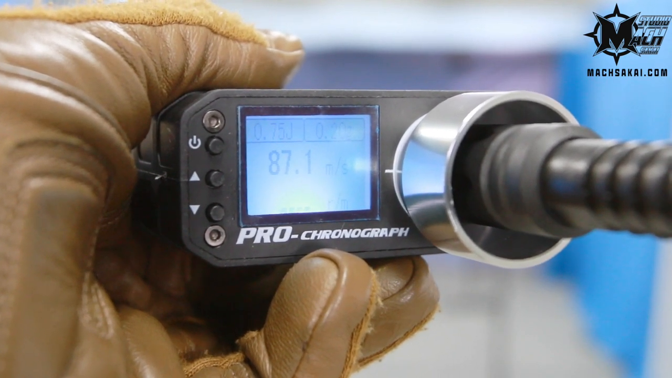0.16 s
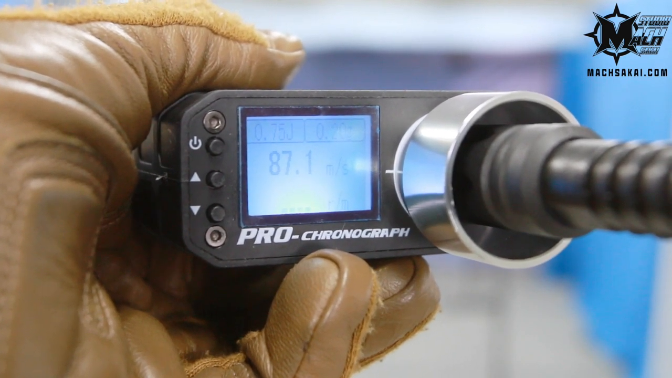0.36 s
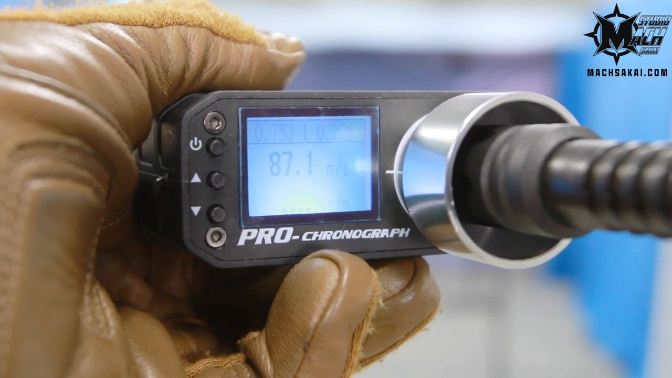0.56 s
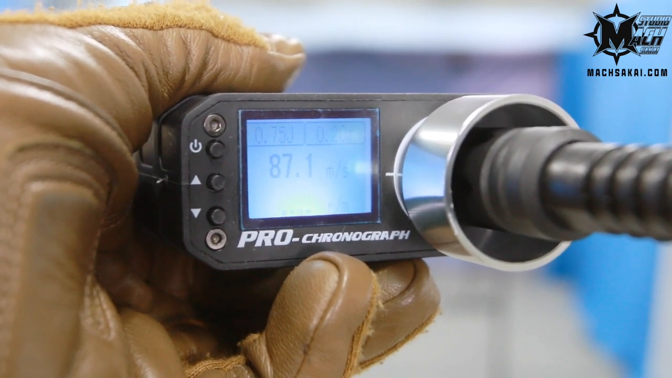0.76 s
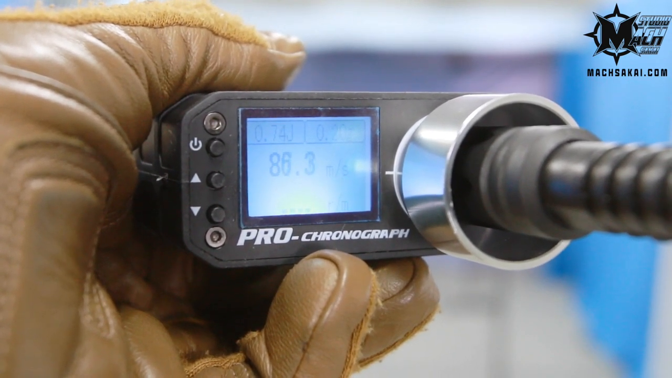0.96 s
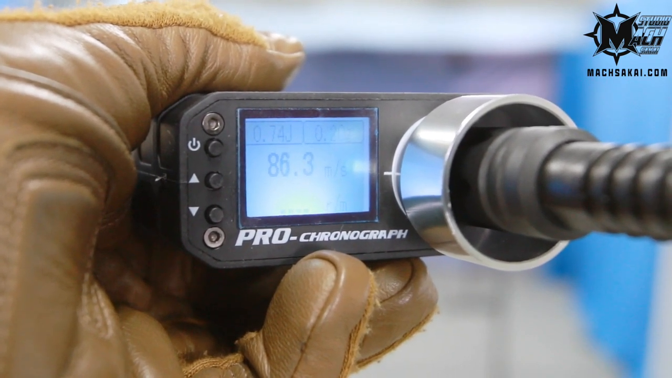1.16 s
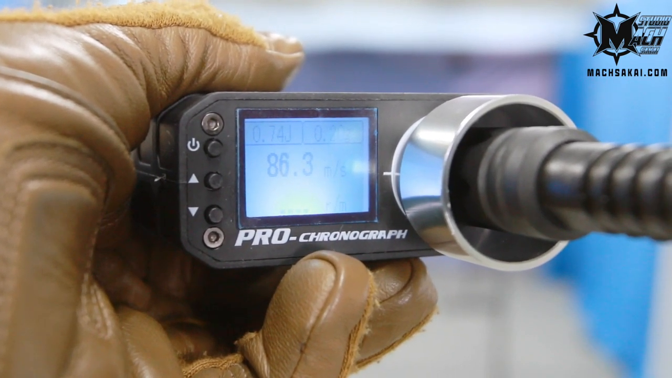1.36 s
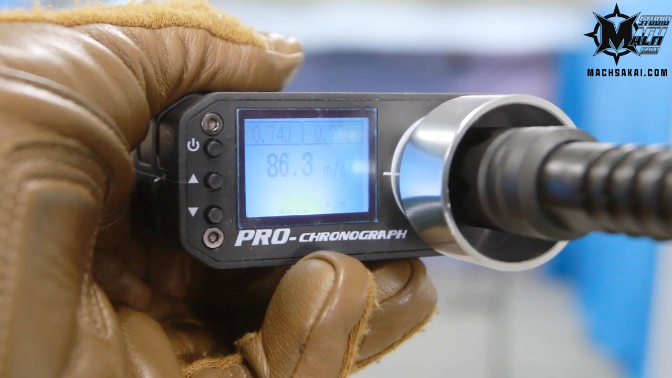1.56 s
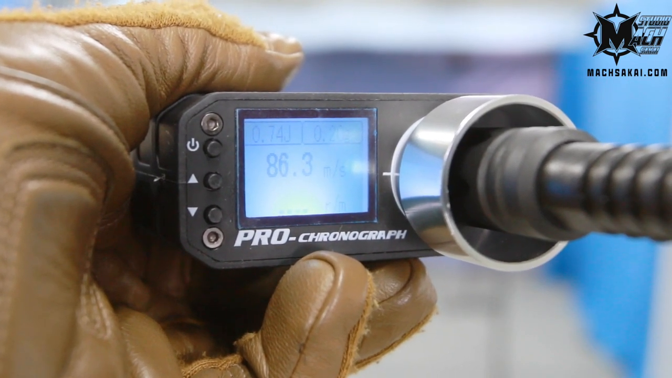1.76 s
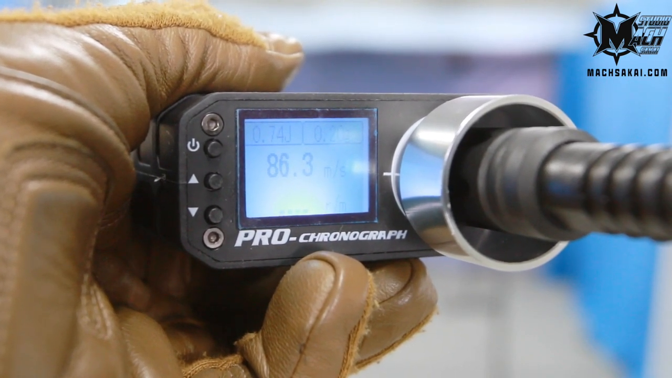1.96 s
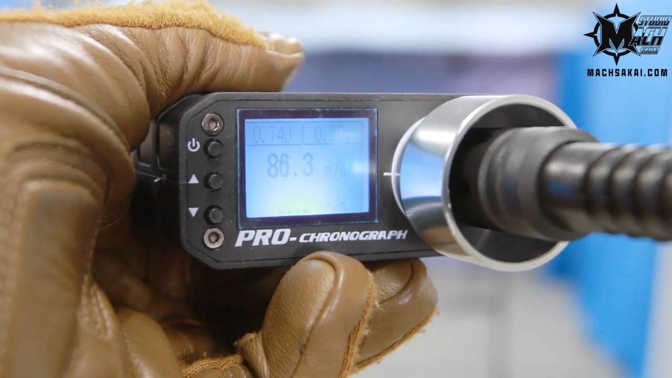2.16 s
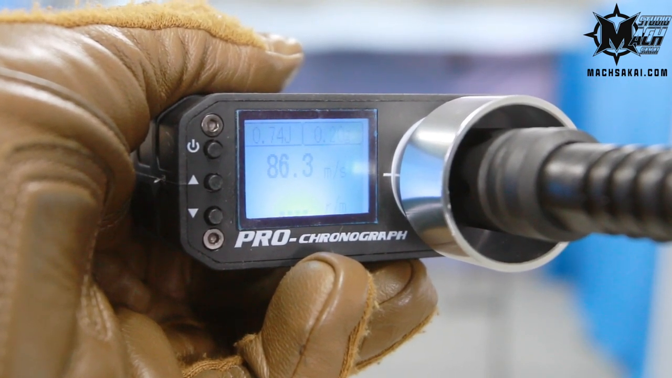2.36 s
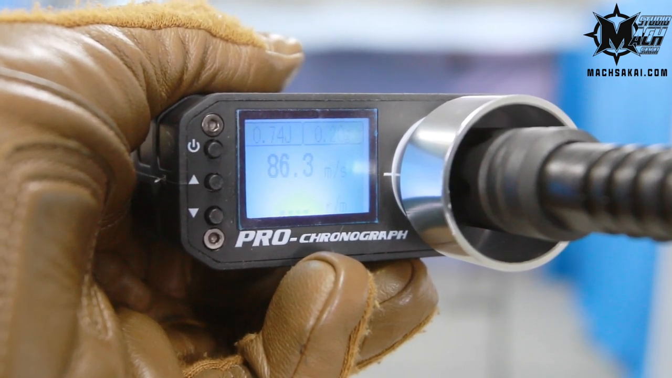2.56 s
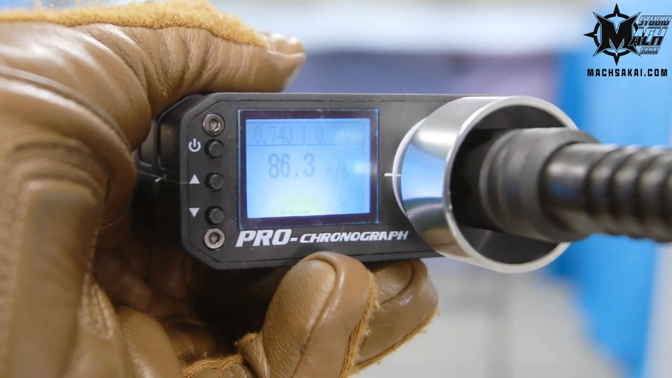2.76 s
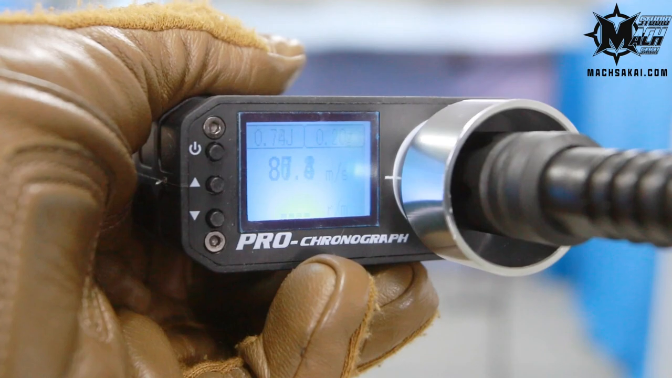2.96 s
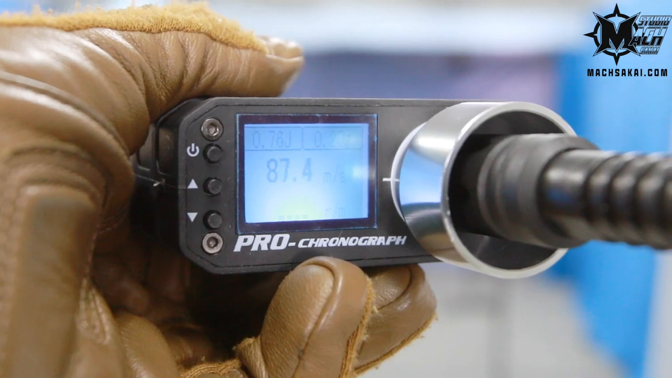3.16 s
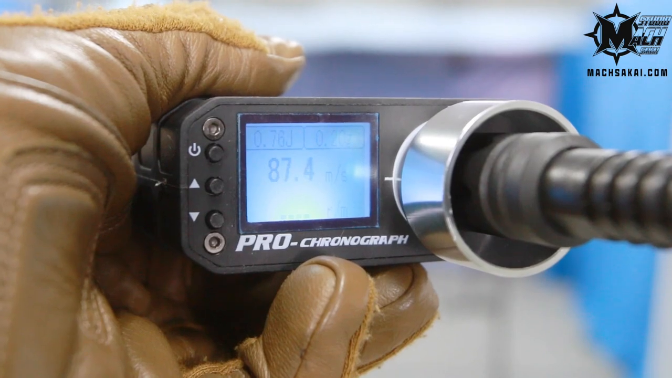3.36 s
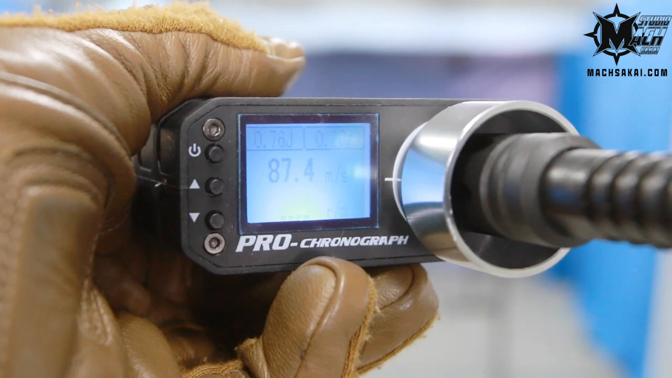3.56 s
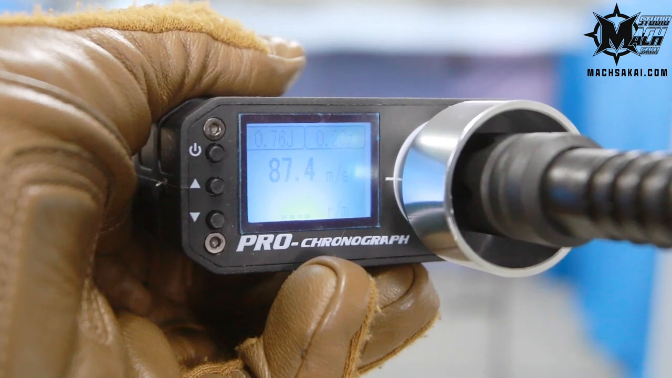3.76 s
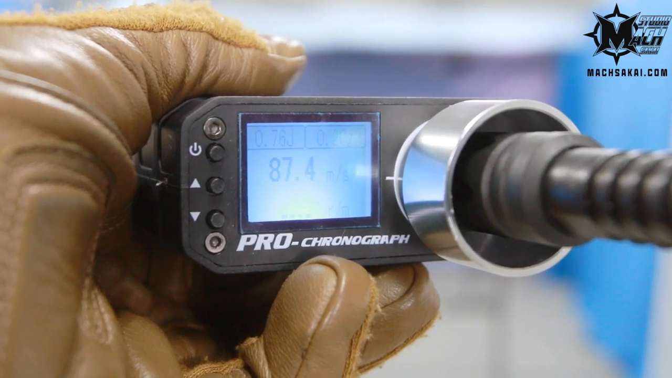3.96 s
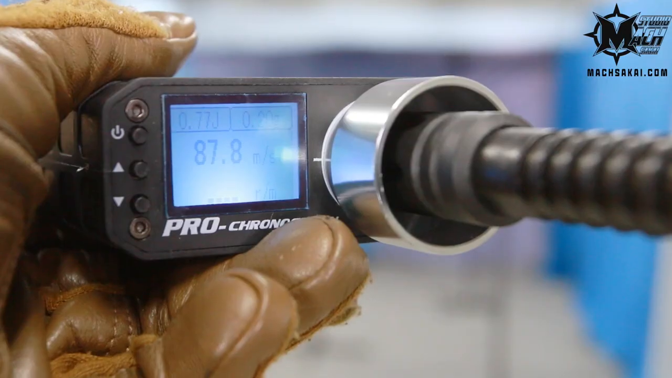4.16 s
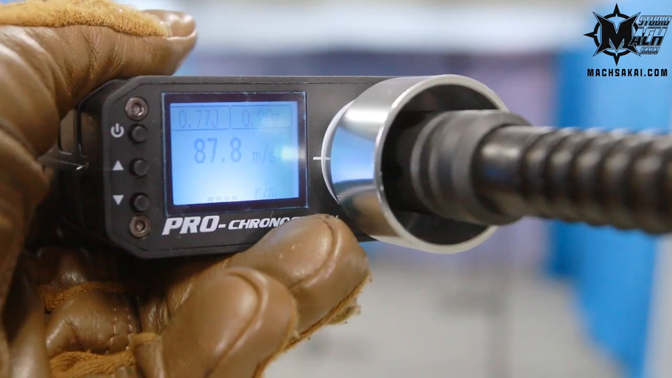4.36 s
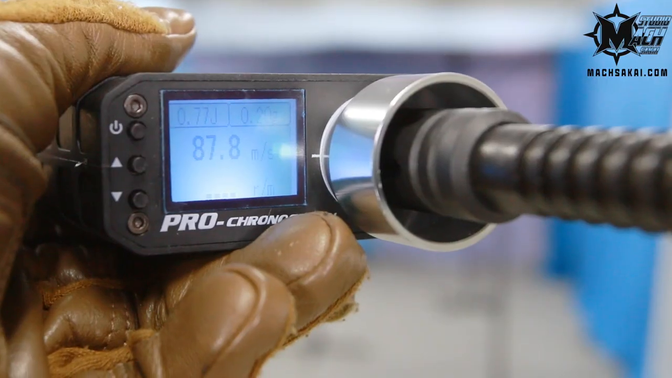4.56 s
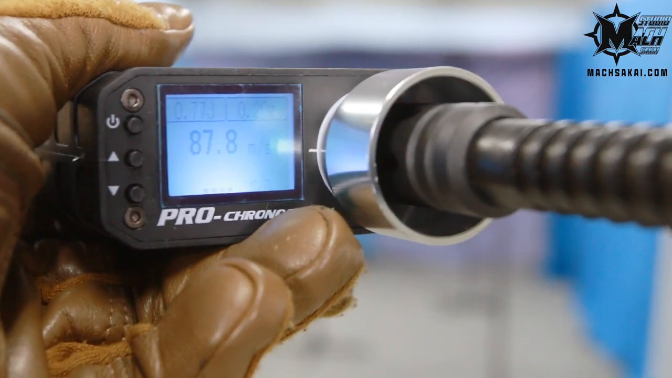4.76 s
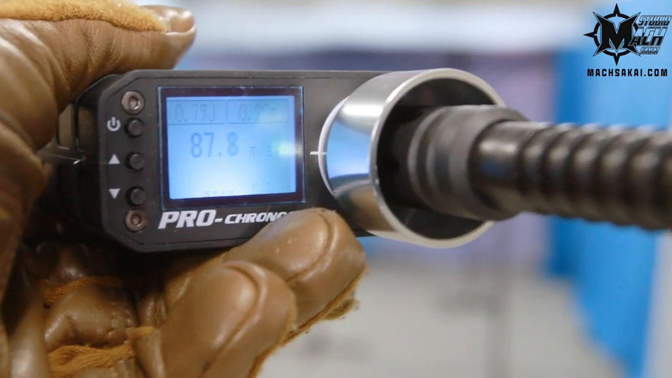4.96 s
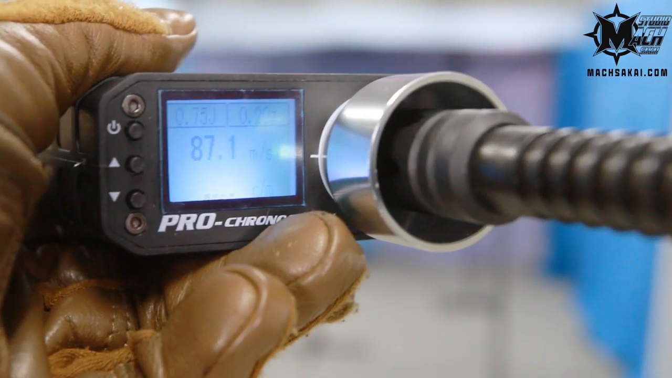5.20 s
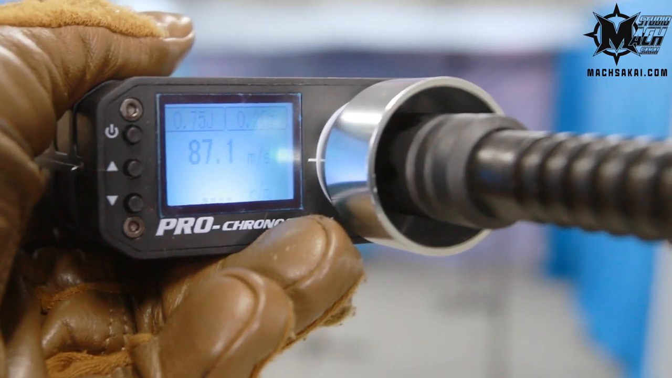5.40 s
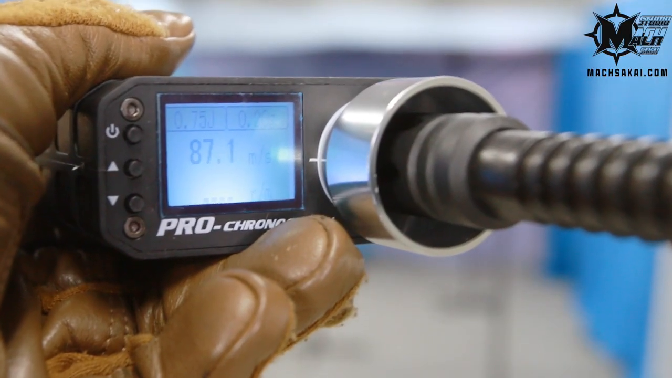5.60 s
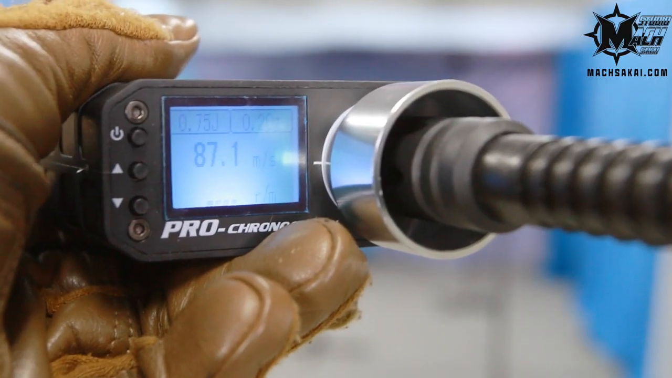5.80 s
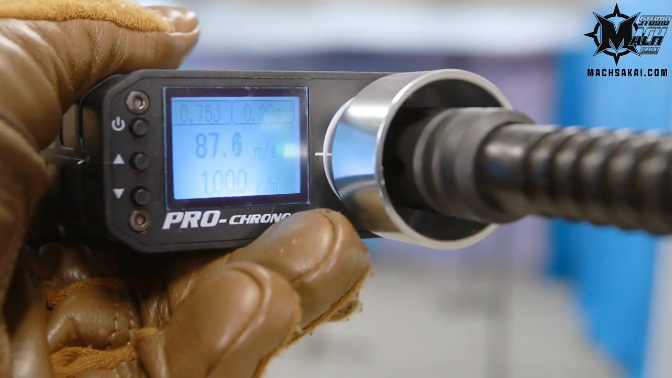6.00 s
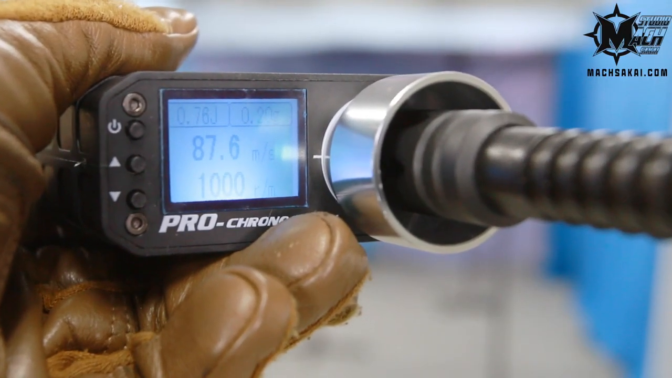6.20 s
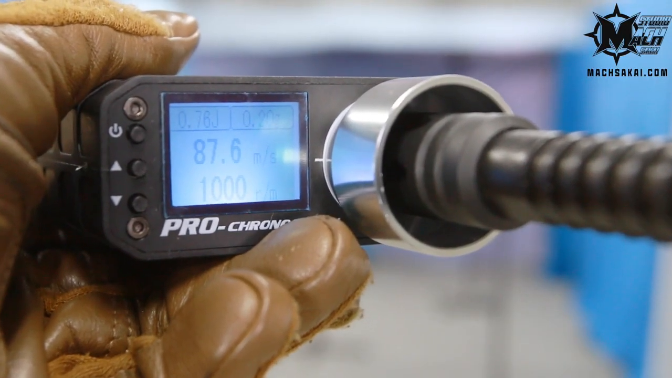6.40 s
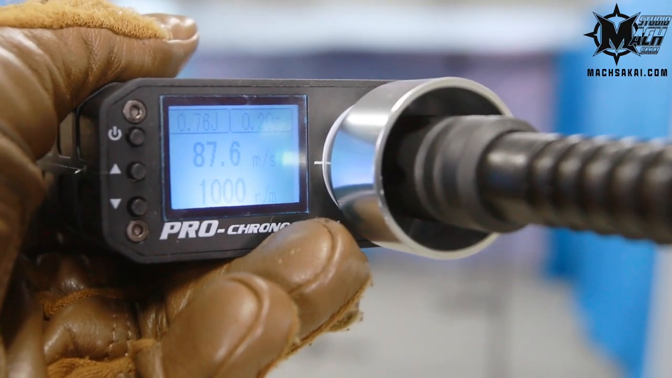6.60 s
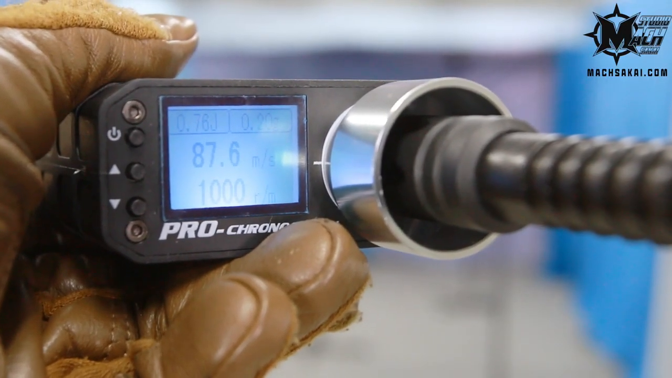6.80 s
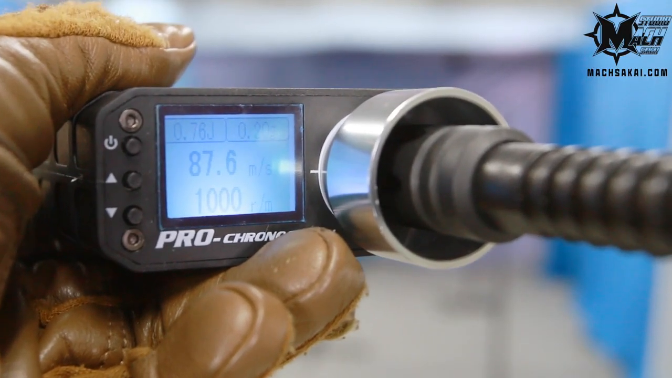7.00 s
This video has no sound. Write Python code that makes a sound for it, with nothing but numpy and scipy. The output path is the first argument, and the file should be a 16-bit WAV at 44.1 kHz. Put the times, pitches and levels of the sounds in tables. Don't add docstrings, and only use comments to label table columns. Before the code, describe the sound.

Two separate electric airsoft shots crack with brief motor whirs and ringing metal, then a one-second full-auto burst hammers before pellets skitter on the floor.

```python
import sys
import numpy as np
from scipy import signal
from scipy.fft import rfft, irfft
from scipy.io import wavfile
from scipy.ndimage import uniform_filter1d

SR = 44100
rng = np.random.default_rng(int(sys.argv[2]) if len(sys.argv) > 2 else 0)


def dump(signal):
    limited = np.clip(np.atleast_2d(signal).T, -1, 1)
    pcm = np.round(limited * 32767).astype(np.int16)
    wavfile.write(sys.argv[1], SR, pcm)


def natural_amplitude(level_db):
    exponent = np.asarray(level_db, float) / 20
    return 10 ** exponent


N = 310464

# start/s, overall gain/dB, room tone/dB
TAKES = [
    (0, -0.97, -50.5),
    (4.14, -2, -52),
    (6.404, 0.5, -50),
]
# f/Hz, level per Hz/dB
HUM_MID = [(12, -33.5), (20, -2), (87, -5), (157, -4.5), (207, -7), (266, -6.5), (478, -17), (686, -17),
           (746, -21), (834, -16), (1800, -29.5), (15500, -38.5)]
# f/Hz, level per Hz/dB
HUM_SIDE = [(12, -39.5), (20, -12), (70, -11.5), (106, 1), (133, -14), (171, -14.5), (196, -28),
            (259, -15.5), (440, -31), (614, -24.5), (1420, -37.5), (15500, -48.5)]
# t/s, level/dB
BOUNCES = [(0.0512, -42), (0.4242, -40), (0.567, -41.5), (1.3084, -32), (1.945, -34.5), (2.3147, -41.5),
           (2.5444, -43.5), (3.34, -32), (3.973, -38.5), (5.9295, -40.5), (5.9871, -35.5), (6.0639, -35),
           (6.153, -37), (6.178, -30.5), (6.2519, -35), (6.3994, -36.5), (6.4236, -34), (6.5751, -37.5),
           (6.6044, -36.5), (6.7395, -34), (6.8141, -32), (6.8903, -43), (6.9341, -33), (6.9995, -50)]
# delay/s, level/dB
FLUTTER = [(0, -2), (.0025, -2), (0.0134, -1.5), (.028, -3.5), (.033, -8.5), (.059, -13)]
# f/Hz, level/dB
BOUNCE = [(3000, -34.5), (5000, -10), (7500, -2.5), (10500, 1), (14500, -1.5), (17000, -15.5)]
# f/Hz, t60/s
ROOM = [(60, 1), (250, 0.83), (700, 0.61), (1500, 0.5), (2700, 0.61), (4000, 0.53), (9000, .38),
        (15000, 0.49)]
# t/s, level/dB, f/Hz, t60/s, side level/dB
BUMPS = [(0.683, -26, 154, 0.18, 0), (1.594, -36.5, 121.9, 0.15, -4), (2.1, -25, 146, 0.16, 0),
         (2.171, -31, 153, 0.097, 2), (2.281, -31.5, 131, 0.08, -4.5), (2.329, -38, 102, 0.08, -6),
         (3.293, -27.5, 129, 0.085, -2), (3.562, -43.5, 102, 0.08, -3.5), (3.865, -35, 160.9, 0.12, -8),
         (6.428, -38, 101.8, 0.12, -4.5), (6.991, -32.5, 132, 0.25, -1)]
# t/s, level/dB, f/Hz
CREAKS = [
    (1.723, -40.5, 1580),
    (3.716, -40, 1620),
    (4.3587, -54, 1240),
    (6.565, -47, 1900),
    (6.599, -46, 2100),
]
# trigger t/s, first slam t/s, motor off t/s, gear level/dB, slam level/dB
PULLS = [
    (0.729, .811, .85, -0.5, 2.5),
    (2.674, 2.751, 2.789, 0, 1.5),
    (4.735, 4.816, 5.76, -3.5, -1),
]
# f/Hz, level per Hz/dB
GEARS = [(90, -29.5), (150, -7), (350, -17.5), (650, -10), (1000, -9), (1500, -6.5), (2200, -9.5),
         (3300, -6.5), (5000, -11), (8500, -13), (12000, -21.5), (15500, -27), (17000, -56.5)]
# f/Hz, width/Hz, level/dB
CASE = [(644, 80, -0.5), (1306, 530, 3), (2186, 200, -9), (4470, 370, 3), (6030, 170, -4.5),
        (8580, 900, -0.5)]
# f/Hz, width/Hz, level/dB
SINGS = [(1304, 62, 1.5), (1665, 55, 0), (2394.2, 40, -2)]
# f/Hz, level/dB, t60/s
BODY = [(239, -7.5, .06), (332, -8, 0.054), (434, -6, 0.049), (717.3, -3, .04), (880, -5, .03),
        (1020, -6, 0.01), (1184, 0.5, 0.026), (1394, 2.5, .035), (1680, -7.5, 0.01), (2100, -2, 0.039),
        (2520, -1, 0.019), (2600, -3, 0.029), (2916, -3.5, 0.029), (3730, -11, 0.045)]
# f/Hz, level/dB
CRACK = [(150, -11.5), (400, -9), (1000, 4), (2500, -6.5), (3500, -8.5), (8000, -19.5), (15000, -27)]
# f/Hz, level/dB, t60/s
THUMP = [(134.6, 0, 0.11), (186, -14.5, 0.063)]
# f/Hz, level/dB, t60/s
BOOM = [(50, -7, .2), (70, -5, 0.22), (98, -5, 0.47), (107.4, -2, 0.51)]
# f/Hz, level/dB, t60/s
RINGS = [(515, -44, 2.6), (618, -49, 2.), (702, -53, 2.6), (1550, -55, 1.3), (2640, -47, .7),
         (2790, -50, .6)]
# f/Hz, left over right/dB
LEAN = [(60, 8), (240, 2), (950, 0.5), (3770, -4.5), (9000, -4), (15000, -0.5)]
# f/Hz, level/dB
SIDEWAYS = [(100, -14.5), (300, -3.5), (1000, -9), (3000, -6), (8000, -4.5), (15000, -3.5)]
# t/s, level/dB, panel drumming/dB
SMACKS = [
    (0.9143, -12.5, -23),
    (0.9383, -20.5, -25),
    (0.9717, -20.5, -25),
    (2.8623, -10.5, -29.5),
    (2.8885, -16.5, -36.5),
    (2.9292, -20.5, -41),
    (5.8227, -12, -12.5),
    (5.8441, -19, -21),
]
# f/Hz, level/dB
SMACK = [(200, -10), (600, 0), (1500, -3), (4000, -4.5), (8000, -10.5), (15000, -26.5)]
# t/s, level/dB
SCATTER = [(5.85, -63), (6.05, -66), (6.2, -58.5), (6.33, -64), (6.41, -66), (6.45, -54.5), (6.78, -57),
           (7.04, -58.5)]
# f/Hz, level/dB
ROLL = [(800, -17.5), (2000, -6.5), (4000, -8), (7000, -7), (10500, -4.5), (15000, -2)]
# f/Hz, level/dB, t60/s
CREAK_UPPER = [(1250, -3, .01), (2300, -3, .008), (2900, -4, .01), (3600, -6, .006)]

START_HZ, LOADED_HZ, FREE_HZ, STOP_HZ = 701.5, 1691, 2366, 1199
SPIN_S, FREE_S, COAST_S, DROP_S = .052, .085, .052, 0.014
START_DB, EARLY_DB, RUN_DB, OFF_DB, STOP_DB = -28.5, -18.5, -12, -13, -33
WHINE_START_DB, WHINE_EARLY_DB, STRAIN_DB, SLACK_DB, CRUISE_DB, WHINE_STOP_DB = -36.5, -21.5, -13, -26, -24, -44
FIRST_STEP_DB = -14
BURST_SHOTS, SECOND_S, CYCLE_S, JITTER_S = 14, 4.8858, .06468, .0008
BURST_DB, GROWTH_DB, SPREAD_DB = -0.5, 1.5, 0.88
TICK_DB, FIRST_TICK_DB, TICK_SPREAD_DB = -14, -24, 1.9
PUSH_DB, FIRST_PUSH_DB, PUSH_SPREAD_DB = -27, -22, 2.5
REBOUND_S, REBOUND_DB = .035, -8.5
FEW_PER_S, MANY_PER_S, FEW_DB, MANY_DB = 200, 600, -64, -56
CUT_S, DIP_DB, DIP_S = 6.404, -24, .012


def evened(x):
    return x / np.sqrt(np.mean(x ** 2) + 1e-20)


def levelled(x):
    z = rfft(x, 2 * len(x))
    return irfft(z / abs(z))[:len(x)]


def read(points, hz):
    f, value = np.transpose(points)
    return np.interp(np.log(hz + 1), np.log(f + 1), value)


def per_take(axis):
    columns = np.transpose(TAKES)
    return columns[axis][np.searchsorted(columns[0], np.arange(N) / SR, "right") - 1]


def add(mix, s, sound):
    part = mix[..., round(s * SR):][..., :sound.shape[-1]]
    part += sound[..., :part.shape[-1]]


def colour(x, points):
    gain_db = read(points, abs(np.fft.fftfreq(4096, 1 / SR)))
    log_gain = np.log(natural_amplitude(np.maximum(gain_db, -100)))
    taps = np.fft.ifft(np.exp(np.conj(signal.hilbert(log_gain)))).real[:2048]
    return signal.oaconvolve(x, taps / np.linalg.norm(taps))[:len(x)]


def resonate(x, hz, width):
    turn = np.exp(2j * np.pi * np.cumsum(hz * np.ones(len(x))) / SR)
    r = np.exp(-np.pi * width / SR)
    return 2 * (turn * signal.lfilter([1 - r], [1, -r], x / turn + 1e-18)).real


def modes(table, seconds):
    t = np.arange(round(seconds * SR)) / SR
    return sum((-1) ** k * natural_amplitude(db - 60 * t / t60) * np.sin(2 * np.pi * hz * t)
               for k, (hz, db, t60) in enumerate(table))


def burst(seconds, rise, t60):
    t = np.arange(round(seconds * SR)) / SR
    x = rng.standard_normal(len(t)) * (1 - np.exp(-t / rise)) * natural_amplitude(-60 * t / t60)
    return x / np.linalg.norm(x)


def room_tone():
    frames, hz = N // 512 + 5, np.fft.rfftfreq(2048, 1 / SR)
    a, b, c, d, patches = rng.standard_normal((frames, 1025, 5)).T
    smooth = uniform_filter1d(uniform_filter1d(patches, 8, 0), 6, 1)
    lumps_db = evened(smooth) / (1 + hz[:, None] / 600)
    mid_bins = (a + 1j * b) * natural_amplitude(read(HUM_MID, hz))[:, None]
    side_bins = (c + 1j * d) * natural_amplitude(read(HUM_SIDE, hz))[:, None]
    z = np.array([mid_bins, side_bins]) * natural_amplitude(lumps_db)
    mid, side = signal.istft(z, nperseg=2048, noverlap=1536)[1][:, :N]
    fan = evened(resonate(rng.standard_normal(N), 702, 9.1))
    mid = evened(mid) + natural_amplitude(-16) * fan
    side = natural_amplitude(3) * evened(side)
    return natural_amplitude(per_take(axis=2)) * np.array([mid + side, mid - side])


def pellets():
    out = np.zeros((2, N))
    for s, db in BOUNCES:
        for late, echo_db in FLUTTER:
            tick = colour(np.pad(burst(.003, .0001, 0.0036), (0, 200)), BOUNCE)
            level_db = db + echo_db + 8 + 0.94 * rng.standard_normal((2, 1))
            add(out, s + late * rng.uniform(0.93, 1.05), natural_amplitude(level_db) * tick)
    return out


def room(x):
    taps = np.zeros((2, SR))
    at = np.arange(200, SR - 20, 20) + rng.integers(0, 20, (2, (SR - 201) // 20))
    np.put_along_axis(taps, at, rng.choice([-1., 1.], at.shape), 1)
    hz, t, z = signal.stft(taps, SR, nperseg=256)
    decay = natural_amplitude(-60 * t / read(ROOM, hz)[:, None])
    tail = signal.istft(z * decay, SR, nperseg=256)[1]
    return signal.fftconvolve(x * np.ones((2, 1)), tail / np.linalg.norm(tail[0]), axes=1)[:, :N]


def handling():
    out = np.zeros((2, N))
    palm = signal.windows.hann(300) / 120
    for s, db, hz, t60, side_db in BUMPS:
        bump = signal.oaconvolve(modes([(hz, db, t60)], .3), palm)
        thud = signal.oaconvolve(modes([(.6 * hz, db + side_db, 1.8 * t60)], .3), palm)
        add(out, s, bump + np.outer([1, -1], thud))
    for s, db, hz in CREAKS:
        plastic = modes([(hz, -2, .008)] + CREAK_UPPER, .04)
        add(out, s, natural_amplitude(db - 2.5) * signal.oaconvolve(burst(.012, .001, .025), plastic))
    return out


def pull(trigger, slam, off, gear_db, slam_db):
    climb = LOADED_HZ - START_HZ
    run_db = RUN_DB + gear_db
    rows = [(trigger, START_DB, START_HZ, WHINE_START_DB),
            (trigger + .35 * SPIN_S, EARLY_DB, START_HZ + .36 * climb, WHINE_EARLY_DB),
            (trigger + .68 * SPIN_S, run_db, START_HZ + .65 * climb, FIRST_STEP_DB + 3.5 * gear_db),
            (trigger + SPIN_S, run_db, START_HZ + .94 * climb, STRAIN_DB),
            (slam - DROP_S, run_db, LOADED_HZ, STRAIN_DB - 4),
            (slam, RUN_DB, LOADED_HZ, SLACK_DB)]
    held = off - slam > FREE_S
    if held:
        rows += [(slam + FREE_S, RUN_DB, FREE_HZ, CRUISE_DB)]
    return rows + [(off, OFF_DB, FREE_HZ if held else LOADED_HZ, CRUISE_DB),
                   (off + .5 * COAST_S, OFF_DB - 6.5, LOADED_HZ - 180, SLACK_DB - 6),
                   (off + COAST_S, STOP_DB, STOP_HZ, WHINE_STOP_DB)]


def gearbox(rows):
    s, *columns = np.transpose(rows)
    t = np.arange(s[0], s[-1], 1 / SR)
    rattle_db, hz, whine_db = (np.interp(t, s, c) for c in columns)
    knocks = rng.standard_normal(len(t)) * natural_amplitude(1.8 * rng.exponential(1, len(t)))
    rattle = evened(colour(knocks, GEARS))
    rattle += sum(natural_amplitude(db + 3.0) * evened(resonate(knocks, f, w)) for f, w, db in CASE) / len(CASE)
    flutter, wobble = (evened(uniform_filter1d(v, 300)) for v in rng.standard_normal((2, len(t))))
    tone = np.sin(2 * np.pi * np.cumsum(hz * (1 + .02 * wobble)) / SR)
    mesh = natural_amplitude(whine_db + 5) * (1 + 0.55 * flutter) * tone
    whine = sum(natural_amplitude(db + 2) * resonate(mesh, f, w) for f, w, db in SINGS)
    return s[0], natural_amplitude(rattle_db) * evened(rattle) + whine


def slams():
    k, chance = np.arange(BURST_SHOTS), rng.standard_normal((BURST_SHOTS, 4)).T
    beat = np.transpose([SECOND_S + k * CYCLE_S + JITTER_S * chance[0],
                         BURST_DB + GROWTH_DB * k / BURST_SHOTS + SPREAD_DB * chance[1],
                         TICK_DB + TICK_SPREAD_DB * chance[2],
                         PUSH_DB + PUSH_SPREAD_DB * chance[3]])
    firsts, rebounds = [], []
    for trigger, slam, off, gear_db, slam_db in PULLS:
        firsts.append((slam, slam_db, FIRST_TICK_DB, FIRST_PUSH_DB))
        if off - slam < FREE_S:
            rebounds.append((slam + REBOUND_S, slam_db + REBOUND_DB, FIRST_TICK_DB, FIRST_PUSH_DB))
    return firsts + list(beat) + rebounds


def rifle():
    out, blows, pushes = np.zeros((3, N))
    for row in PULLS:
        add(out, *gearbox(pull(*row)))
    habit = burst(.024, .004, .1)
    for s, db, tick_db, push_db in slams():
        knocks = levelled(habit + .7 * burst(.024, .004, .1))
        grip = rng.normal(1, 0.016)
        body = modes([(hz * grip, mode_db, t60) for hz, mode_db, t60 in BODY], .15)
        add(out, s - .002, natural_amplitude(db - 2.5) * signal.oaconvolve(knocks, body))
        add(out, s - .002, natural_amplitude(db + 22) * colour(np.pad(knocks, (0, 1000)), CRACK))
        tick = resonate(resonate(burst(.01, 0.00016, 0.006), 11400, 1300), 11600, 1600)
        add(out, s + 0.0074, natural_amplitude(db + tick_db + 36) * tick)
        push = signal.windows.hann(200) / 100
        add(pushes, s + rng.uniform(0, .005), natural_amplitude(db + push_db + 14) * push)
        blow = signal.windows.hann(300) / 150
        add(blows, s, natural_amplitude(db - 4.5 + 2.5 * rng.standard_normal()) * blow)
    return out + signal.fftconvolve(pushes, modes(THUMP, .3))[:N], blows


def room_boom(blows):
    return np.outer([1.03, -.97], signal.fftconvolve(blows, modes(BOOM, .8))[:N])


def metal_rings():
    struck = np.zeros(N)
    struck[[round(row[1] * SR) for row in PULLS[:2]]] = 1
    return np.outer([1.7, .2], signal.fftconvolve(struck, modes(RINGS, 1.5))[:N])


def bench(x):
    spread = colour(np.pad(levelled(burst(0.023, 0.00024, 0.11)), (0, 500)), SIDEWAYS)
    return x + np.outer([1, -1], natural_amplitude(-2) * signal.oaconvolve(x.mean(0), spread)[:N])


def backstop():
    out = np.zeros(N)
    for s, db, low_db in SMACKS:
        crack = np.pad(levelled(burst(0.026, 0.0016, 0.06)), (0, 1500))
        add(out, s, natural_amplitude(db + 24.5) * colour(crack, SMACK))
        drumming = resonate(resonate(burst(0.18, 0.0083, 0.38), 500, 300), 500, 450)
        add(out, s, natural_amplitude(low_db + 41.5) * drumming)
    return out


def scatter():
    t, (s, db) = np.arange(N) / SR, np.transpose(SCATTER)
    rate = np.interp(db, [FEW_DB, MANY_DB], [FEW_PER_S, MANY_PER_S])
    size = rng.standard_normal((2, N)) * natural_amplitude(2.5 * np.minimum(rng.exponential(1, N), 2))
    ticks = size * (rng.random(N) < np.interp(t, s, rate, left=0) / SR)
    patter = np.array([colour(side, ROLL) for side in ticks])
    return natural_amplitude(np.interp(t, s, db) - 6.5) * evened(patter)


def scene():
    gun, blows = rifle()
    ticks, loud = pellets() + scatter(), gun + backstop()
    sides = [colour(loud, [(f, sign * db / 2) for f, db in LEAN]) for sign in (1, -1)]
    direct = bench(np.array(sides))
    shots = direct + natural_amplitude(-7) * room(loud) + room_boom(blows) + metal_rings()
    shots[:, round(CUT_S * SR):] = 0
    return shots + ticks + natural_amplitude(2.5) * room(ticks) + handling() + room_tone()


def band_limit(x):
    return signal.sosfilt(signal.butter(12, 15660, fs=SR, output="sos"), x)


def record(dry):
    thin = signal.sosfilt(signal.butter(2, 40, "high", fs=SR, output="sos"), dry)
    thin = signal.oaconvolve(thin, signal.firwin(1023, 15740, fs=SR)[None], "same")
    held = np.clip(4 * np.tanh(thin / 4), -1.04, 1.04)
    since = np.arange(N) / SR - CUT_S
    dip_db = DIP_DB * (since > -.002) * (since < DIP_S)
    return band_limit(held * natural_amplitude(per_take(axis=1) + dip_db))


dry = scene()
out = record(dry)
dump(out)
```